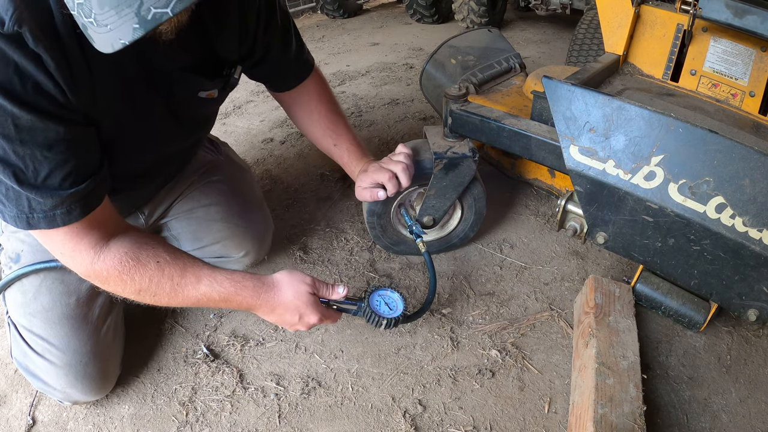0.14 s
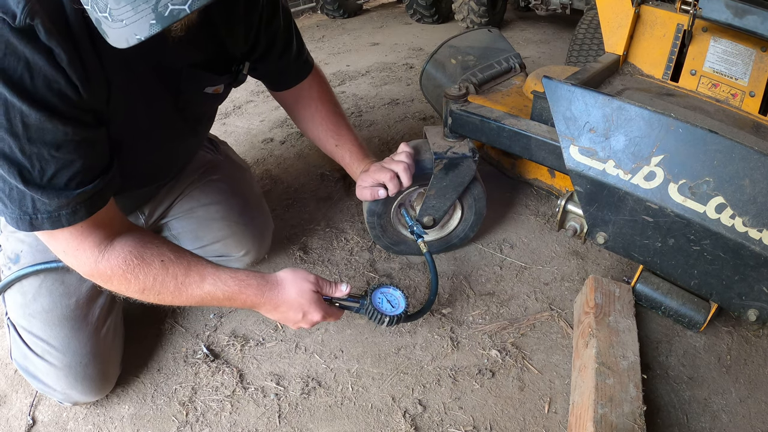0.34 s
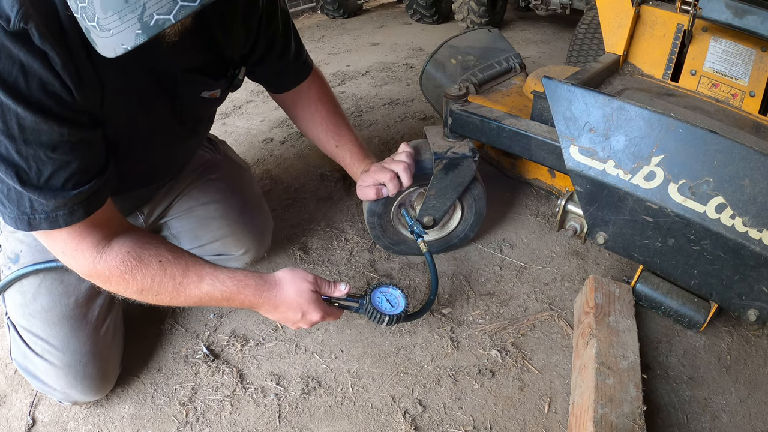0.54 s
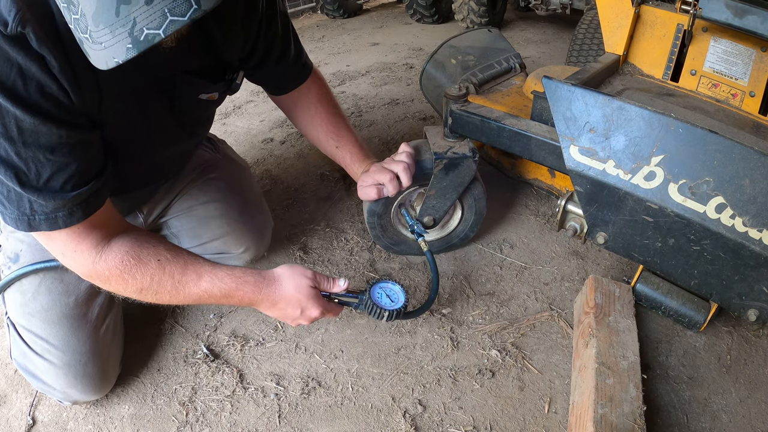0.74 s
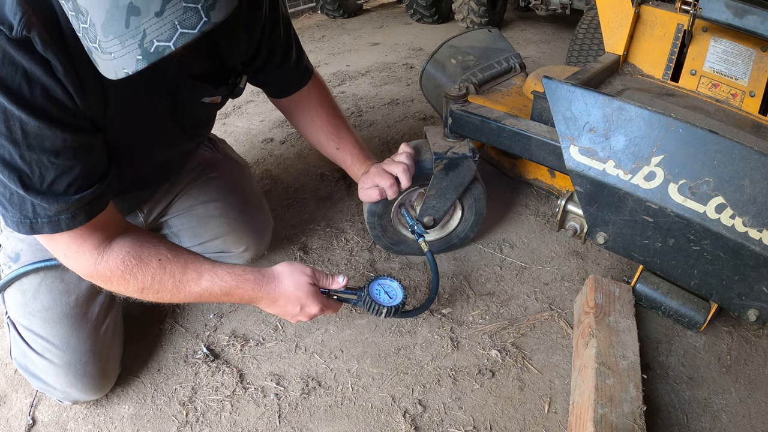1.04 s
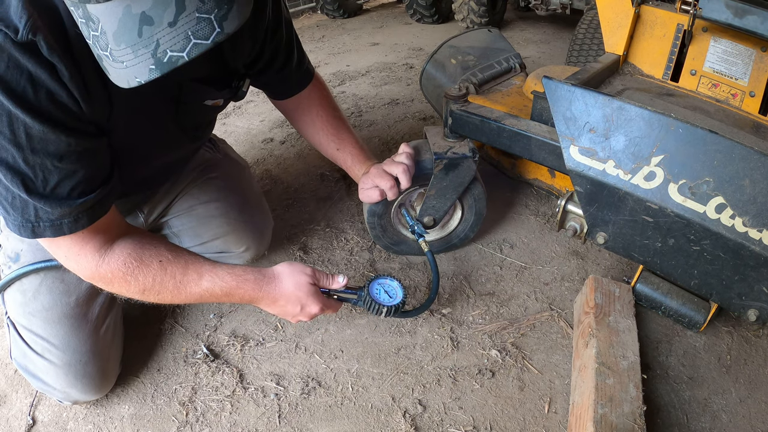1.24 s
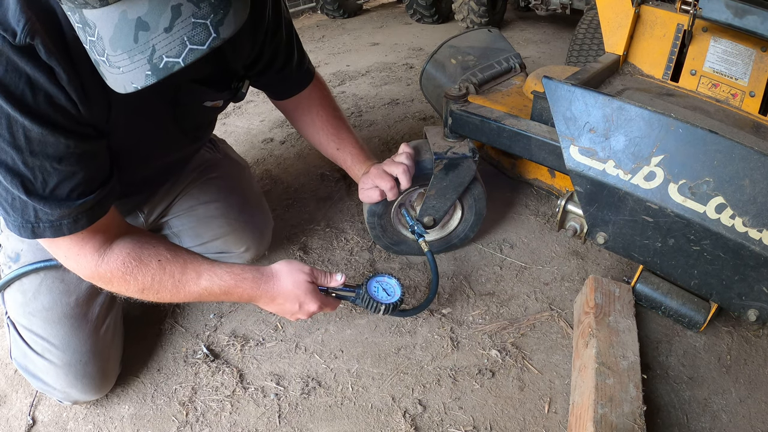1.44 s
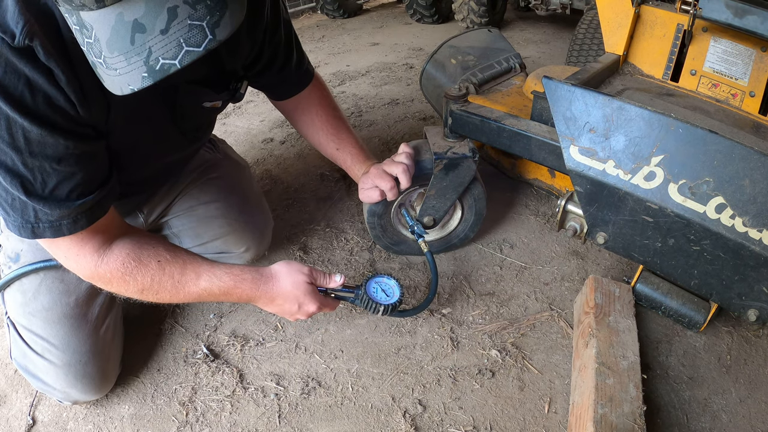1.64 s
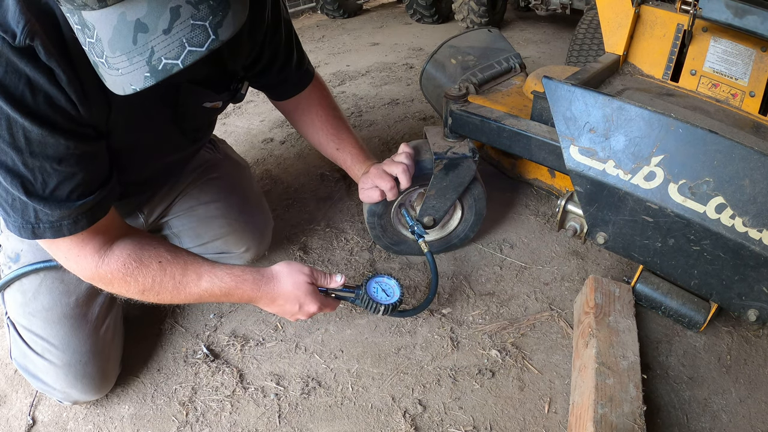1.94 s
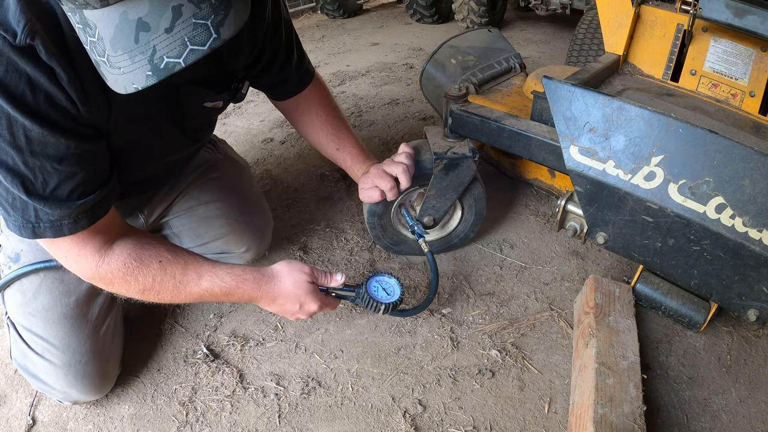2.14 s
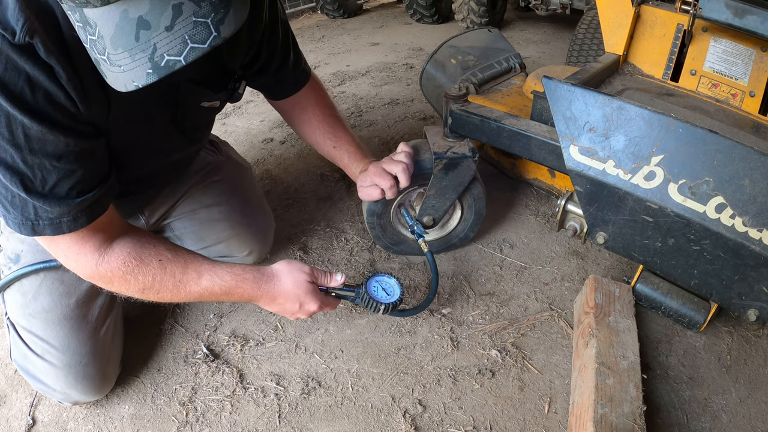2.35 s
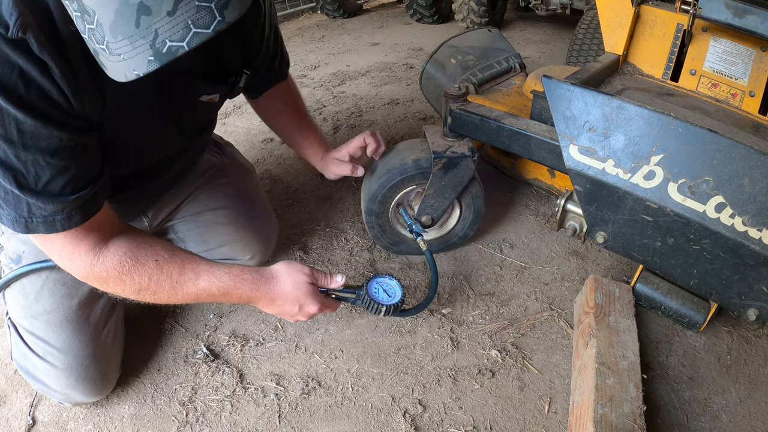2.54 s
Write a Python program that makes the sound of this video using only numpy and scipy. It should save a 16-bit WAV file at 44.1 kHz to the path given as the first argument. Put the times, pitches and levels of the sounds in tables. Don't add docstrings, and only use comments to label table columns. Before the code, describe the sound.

Compressed air hisses steadily into a small tire, sharp and whistly, turning brighter at the end

```python
import sys
import numpy as np
from scipy import signal
from scipy.fft import rfft, irfft
from scipy.io import wavfile
from scipy.ndimage import uniform_filter1d

SR = 44100
rng = np.random.default_rng(int(sys.argv[2]) if len(sys.argv) > 2 else 0)


def makeup_ratio(level_db):
    decades = np.asarray(level_db, float) / 20
    return 10 ** decades


def int16_out(signal):
    q = np.round(np.clip(np.atleast_2d(signal).T, -1, 1) * 32767)
    wavfile.write(sys.argv[1], SR, q.astype(np.int16))


N = 119070

# time in seconds, level in dB.
FLOW = [
    (0.0, -23.5),
    (0.29, -24),
    (0.31, -22.5),
    (0.36, -23),
    (0.98, -23),
    (1.03, -22),
    (1.82, -22),
    (2.13, -21.5),
    (2.47, -22),
    (2.58, -22.5),
]
# time in seconds, firmness from 0 soft to 1 firm.
FIRMNESS = [
    (0, 0.047),
    (0.5, 0.068),
    (0.95, 0.24),
    (1.3, 1),
    (1.8, 0.93),
    (2.7, 0.96),
]
# frequency in Hz, level in dB per Hz.
JET = [(1500, -34.5), (2300, -29), (3300, -22.5), (4300, -12), (5500, -9), (7600, -14), (13500, -13),
       (15600, -22)]
# frequency in Hz, width in Hz, level in dB.
HELD_TIRE_MODES = [(2450, 15, -12), (2560, 15, -11), (2800, 150, -9), (3060, 34, -8), (3540, 55, -15),
                   (4090, 93, -6), (4540, 58, -1), (4980, 34, -5), (5420, 49, -2), (5600, 34, -1),
                   (5920, 34, 0), (6090, 61, 0)]
TIRE_HZ = [2285, 2585, 2700, 2818, 3080, 3316, 3540, 4026, 4065]
RIM_HZ = [4546, 4660, 4915, 5077, 5160, 5253, 5620, 5760, 6030, 6105, 6292, 6640, 6761, 7050]
CHUCK_HZ = [7240, 7700, 8210, 8720, 8830, 9325, 9500, 9740, 10372, 11220, 11320, 11470, 11712]
NOZZLE_HZ = [12038, 12395, 12600, 12900, 13135, 13673, 14125, 14520, 14707]
# width in Hz, level in dB when soft, level in dB when firm.
TIRE_MODES = [(25.4,-37,-23), (29.4,-12,-9), (30,-19,-15), (50,-8.5,-7.5), (35,-13.5,-16), (33,-19,-16),
              (50.5,-25,-9), (41,-4.5,-2), (39.8,-18,-8.5)]
RIM_MODES = [(75,-6,-7), (79.6,-18,-7.5), (54,-12,-5.5), (35,-26,-4), (30,-2.5,-1.5), (49.5,-5.5,-1.5),
             (48.7,-2,0), (60,-10,-15), (90,-10.5,-3), (50,-9,-4), (60,-4,2.5), (70,-17.5,-1.5),
             (60,-1,-25), (45,-10,-5)]
CHUCK_MODES = [(50,-9.5,-7), (55,-11,-11), (100,-18.5,-11), (60,-8,-14), (90,-36,-6.5), (50,-20,-13),
               (60,-8,-18), (120,-21,-9), (49.7,-5.5,-3.5), (70,-9.5,-12), (50,-39,-1), (70,-11,-5.5),
               (50,-7,-6)]
NOZZLE_MODES = [(60,-4,-11), (40,-15,-4), (50,-15,-10), (70,-8,-8), (90,-6,-14), (140,-10,-18),
                (50,-24,-12), (55,-23,-14), (70,-26,-14)]
# frequency in Hz, level in dB per Hz.
ROAR = [(20, -1), (100, -7), (450, -0.5), (620, -4), (750, -7.5), (1150, -10), (1500, -8.5), (2400, -9)]
# frequency in Hz, width in Hz, level in dB over the roar.
HOSE_MODES = [(319, 18, 3), (521, 90, -1), (930, 65, 3), (1226, 12, 13), (1294, 55, 10), (2356, 17, 12),
              (2394, 18, 4.5), (2467, 22, 15.5)]
# start in seconds, signed size, ring in Hz, 60 dB decay in seconds.
KNOCKS = [
    (0.029, 0.045, 64, 0.092),
    (0.051, 0.14, 52, 0.053),
    (0.07, -.2, 41, 0.069),
    (0.09, 0.029, 20, 0.22),
]
# centre in seconds, low edge in Hz, high edge in
# Hz, level in dB.
FLICKERS = [
    (.113, 4200, 5200, -40),
    (.113, 13100, 14500, -38),
    (.17, 6000, 14000, -39),
    (.392, 14500, 15700, -47),
    (.81, 13800, 15200, -44),
    (1.415, 4600, 5800, -35),
    (1.786, 10300, 11800, -39),
    (2.088, 9000, 10400, -39),
    (2.32, 12400, 13900, -35),
]
# frequency in Hz, level in dB per Hz.
LEAK = [(60, -16), (444, -15), (1880, -25), (2600, -11.5), (4300, -19), (5400, -0.5), (7600, -9),
        (13200, -1.5), (15600, -15)]
# frequency in Hz, width in Hz, level in dB.
LEAK_MODES = [(2780, 33, 0), (3510, 68, 3), (3960, 94, -0.5), (4840, 33, 13), (5350, 37, -1),
              (5480, 63, 10.5), (6400, 58, -15), (7950, 64, -17)]
# frequency in Hz, level in dB relative to the middle.
SIDE = [(60, -19), (110, -8), (200, -14), (380, -19), (700, -13.5), (1290, -13.5), (2380, -11.5),
        (4400, -43.5), (8120, -40.5), (15000, -24)]

HOP, SIZE = 512, 2048
JET_SOFT_DB, JET_FIRM_DB = -6, -1.7
HELD_DB, HELD_UNTIL_S, HELD_FADE_S = -4.0, 0.30, 0.05
WANDER_DB, WANDER_S = 1.3, 0.35
RIPPLE_DB, RIPPLE_HZ, RIPPLE_S = 2.22, 28.8, 0.64
ROAR_DB, ROAR_FOLLOWS = -44, 0.79
BUMP_RISE_S, FLICKER_S = 0.009, 0.03
LEAK_DB, LEAK_RING_DB, LEAK_DUCKS_DB = -19.5, -3.0, -4
LEAK_START_S, LEAK_RISE_S = 2.523, 0.12


def read(points, hz):
    f, value = np.transpose(points)
    return np.interp(np.log(hz + 1), np.log(f + 1), value)


def grid():
    return np.fft.rfftfreq(SIZE, 1 / SR)[:, None], np.arange(N // HOP + 6) * HOP / SR


def hiss(shape):
    bins, frames = shape.shape
    real, imaginary = rng.standard_normal((frames, bins, 2)).T
    noise = real + 1j * imaginary
    flat = signal.istft(noise, nperseg=SIZE, noverlap=SIZE - HOP)[1]
    shaped = signal.istft(noise * shape, nperseg=SIZE, noverlap=SIZE - HOP)[1]
    return shaped[:N] / flat.std()


def unit(shape):
    return shape / np.sqrt(np.mean(abs(shape) ** 2))


def ringing(modes, level_db):
    hz, t = grid()
    span = max(round(WANDER_S * SR / HOP), 2)
    drift = uniform_filter1d(rng.standard_normal((16, len(t))), span, axis=1)
    drift = drift / drift.std()
    power = 0
    for k, (centre_hz, width_hz, db) in enumerate(modes):
        strength = makeup_ratio(level_db + db + WANDER_DB * drift[k]) ** 2
        power = power + strength / (1 + (1.61 * (hz - centre_hz) / width_hz) ** 2) ** 2
    return power


def ripple():
    hz, t = grid()
    span = max(round(RIPPLE_S * SR / HOP), 2)
    field = rng.standard_normal((len(t), len(hz))).T
    field = uniform_filter1d(uniform_filter1d(field, span), span)
    blur = np.exp(-(np.arange(-8, 9) * SR / SIZE / RIPPLE_HZ) ** 2)[:, None]
    field = signal.fftconvolve(field, blur, "same")
    depth = np.clip(hz / 7000, 0.2, 1)
    return makeup_ratio(RIPPLE_DB * depth * field / field.std())


def leak_open(t):
    return np.sin(np.pi / 2 * np.clip((t - LEAK_START_S) / LEAK_RISE_S, 0, 1)) ** 2


def filling_modes(mode_hz, modes, firm):
    rows = [(hz, width_hz, soft_db + (firm_db - soft_db) * firm)
            for hz, (width_hz, soft_db, firm_db) in zip(mode_hz, modes)]
    return ringing(rows, 0)


def filling():
    hz, t = grid()
    firm = np.clip(np.interp(t, *np.transpose(FIRMNESS)), 0, 1)
    held = np.clip((HELD_UNTIL_S - t) / HELD_FADE_S, 0, 1)
    tire = filling_modes(TIRE_HZ, TIRE_MODES, firm)
    rim = filling_modes(RIM_HZ, RIM_MODES, firm)
    chuck = filling_modes(CHUCK_HZ, CHUCK_MODES, firm)
    nozzle = filling_modes(NOZZLE_HZ, NOZZLE_MODES, firm)
    held_tire = ringing(HELD_TIRE_MODES, HELD_DB)
    jet = makeup_ratio(JET_SOFT_DB + (JET_FIRM_DB - JET_SOFT_DB) * firm) ** 2 * makeup_ratio(read(JET, hz)) ** 2
    power = chuck + nozzle + (1 - held) * tire + (1 - 0.46 * held) * rim + held * held_tire + jet
    shape = np.sqrt(power / power.mean(0)) * ripple()
    flow_db = np.interp(t, *np.transpose(FLOW)) + LEAK_DUCKS_DB * leak_open(t)
    return hiss(shape * makeup_ratio(flow_db))


def roar():
    hz, t = grid()
    flow_db = np.interp(t, *np.transpose(FLOW))
    hose = np.sqrt(1 + ringing(HOSE_MODES, 0))
    low_pass = 1 / np.sqrt(1 + (hz / 2600) ** 16)
    shape = unit(makeup_ratio(read(ROAR, hz)) * hose * low_pass)
    return hiss(shape * makeup_ratio(ROAR_DB + ROAR_FOLLOWS * (flow_db - flow_db.mean())))


def bump():
    t = np.arange(N) / SR
    out = np.zeros(N)
    for start_s, size, hz, t60_s in KNOCKS:
        since = np.maximum(t - start_s, 0)
        envelope = np.minimum(since / BUMP_RISE_S, 1) * makeup_ratio(-60 * since / t60_s)
        out += size * envelope * np.sin(2 * np.pi * hz * since)
    return out


def flickers():
    hz, t = np.fft.rfftfreq(N, 1 / SR), np.arange(N) / SR
    noise, out = rfft(rng.standard_normal(N)), np.zeros(N)
    for centre_s, low_hz, high_hz, db in FLICKERS:
        band = irfft(noise * (hz > low_hz) * (hz < high_hz), N)
        swell = np.cos(np.pi * np.clip((t - centre_s) / FLICKER_S, -0.5, 0.5))
        out += makeup_ratio(db + 3.5) * band / band.std() * swell
    return out


def leak():
    hz, t = grid()
    power = makeup_ratio(read(LEAK, hz)) ** 2 + ringing(LEAK_MODES, LEAK_RING_DB)
    shape = unit(np.sqrt(power) * ripple())
    return makeup_ratio(LEAK_DB) * hiss(shape) * leak_open(np.arange(N) / SR)


def scene():
    mid = filling() + roar() + bump() + leak()
    hz, t = grid()
    spectrum = abs(signal.stft(mid, nperseg=SIZE, noverlap=SIZE - HOP)[2])
    spectrum = np.pad(spectrum, ((0, 0), (0, len(t) - spectrum.shape[1])), "edge")
    level = uniform_filter1d(spectrum, 5, axis=1)
    side = hiss(level * makeup_ratio(read(SIDE, hz)))
    side = side * makeup_ratio(-39) * mid.std() / side.std() + flickers()
    return np.array([mid + side, mid - side])


def top_cut(x):
    return signal.sosfilt(signal.butter(12, 15740, fs=SR, output="sos"), x)


def record(dry):
    return top_cut(dry)


dry = scene()
out = record(dry)
int16_out(out)
```